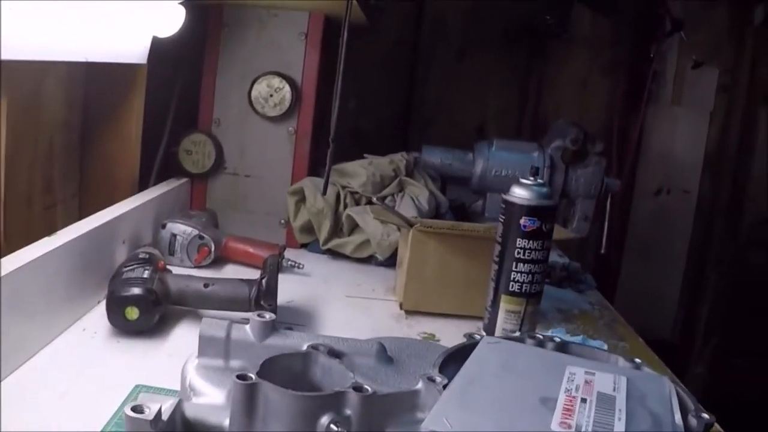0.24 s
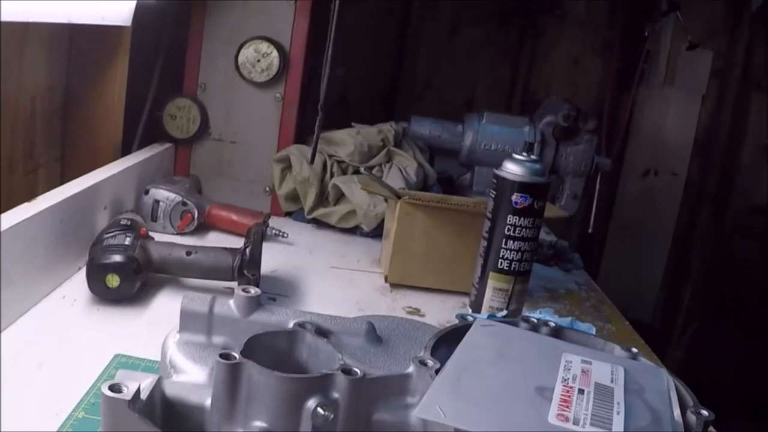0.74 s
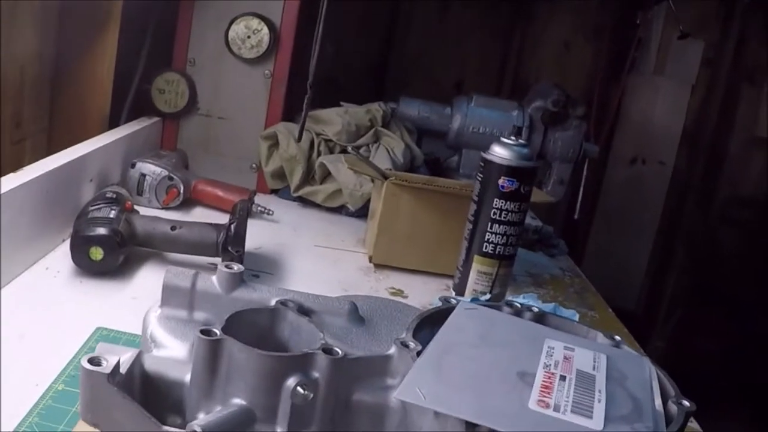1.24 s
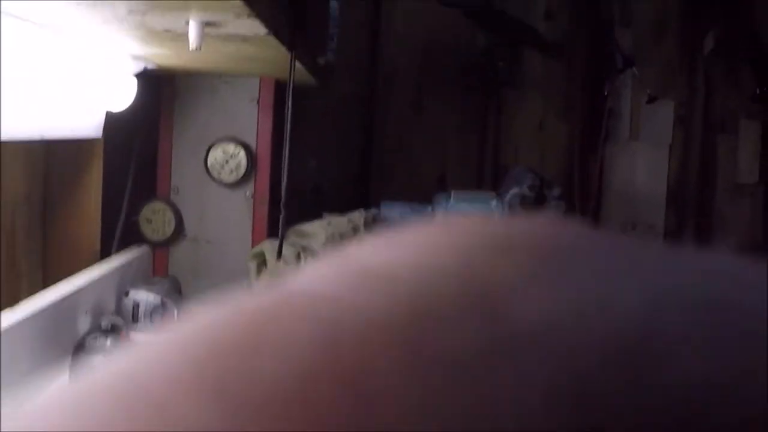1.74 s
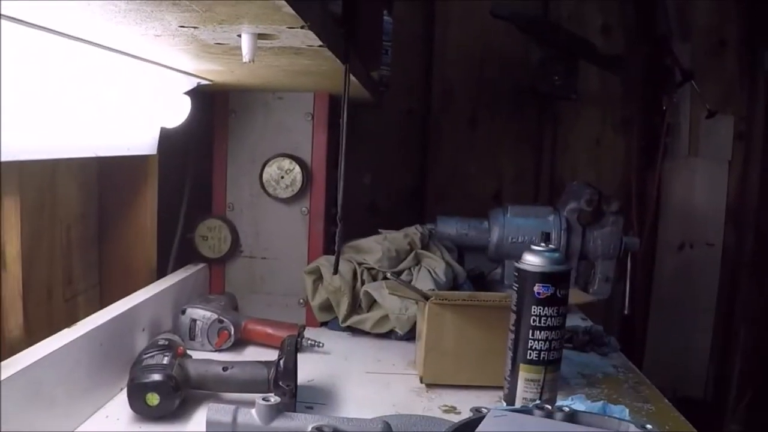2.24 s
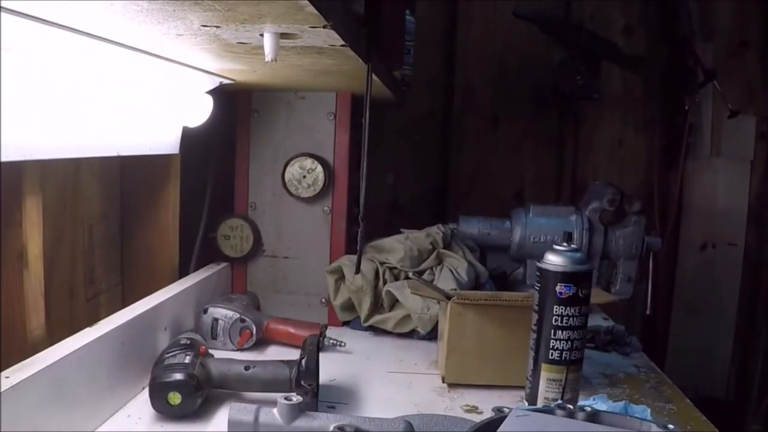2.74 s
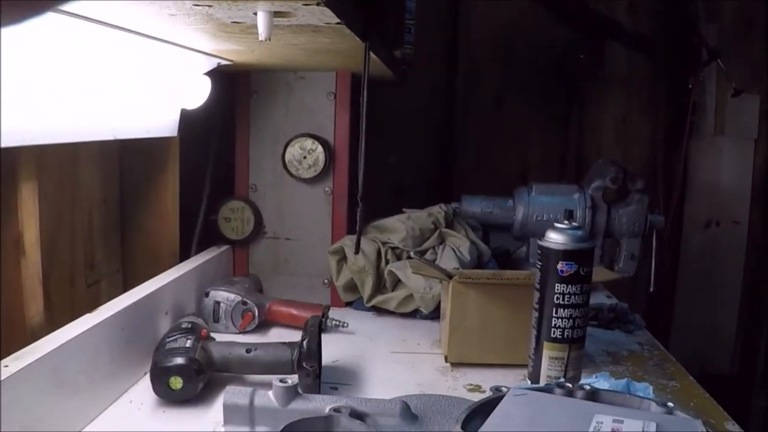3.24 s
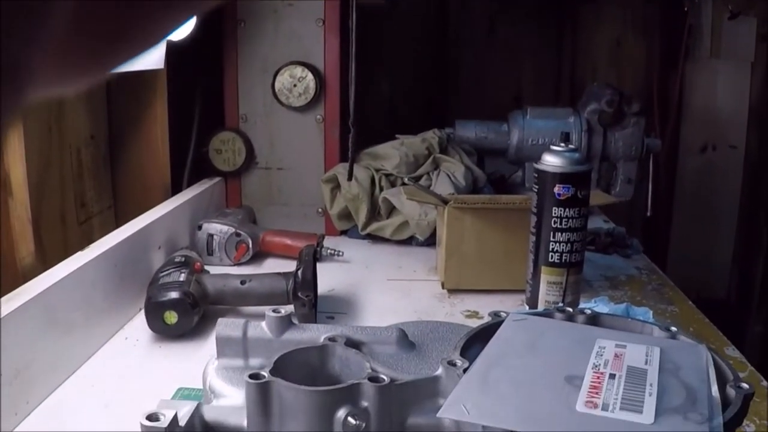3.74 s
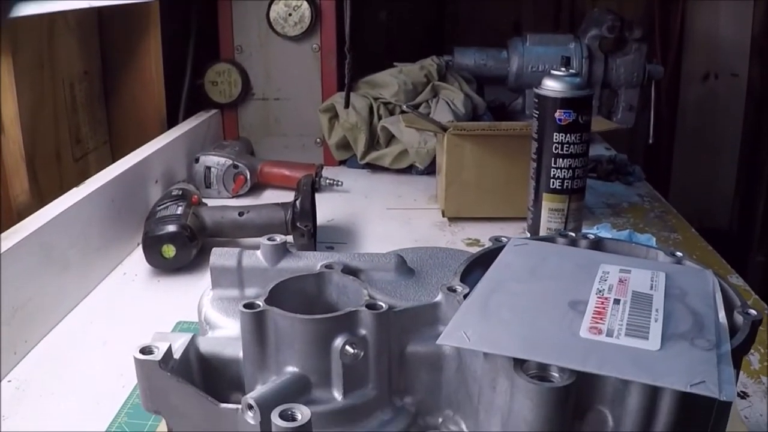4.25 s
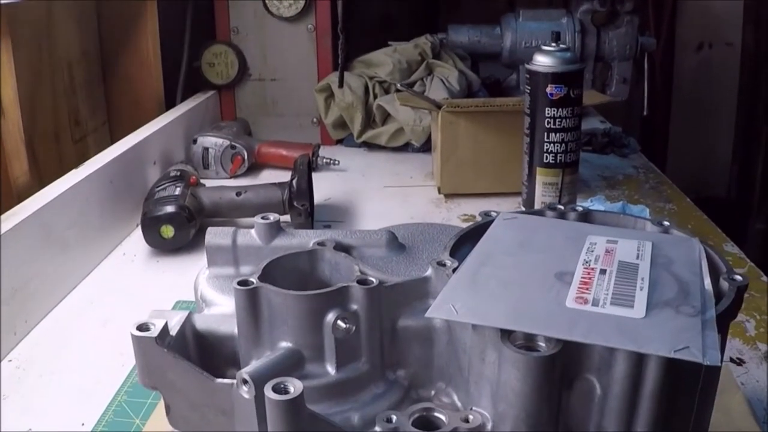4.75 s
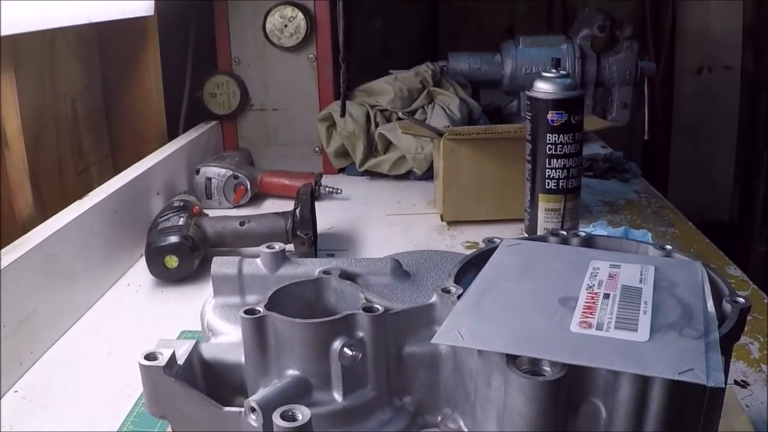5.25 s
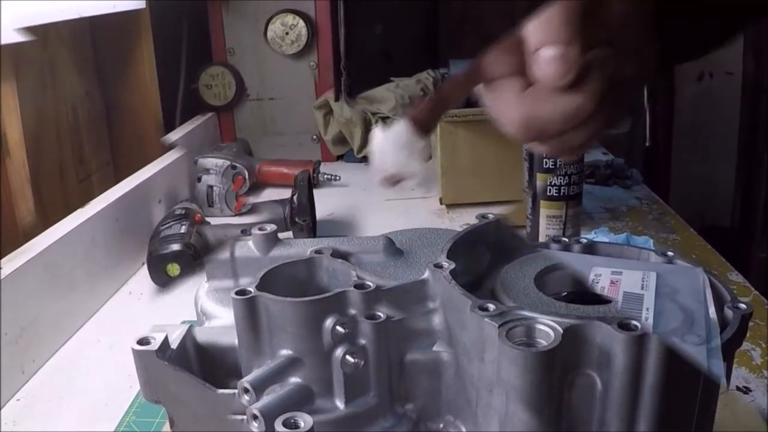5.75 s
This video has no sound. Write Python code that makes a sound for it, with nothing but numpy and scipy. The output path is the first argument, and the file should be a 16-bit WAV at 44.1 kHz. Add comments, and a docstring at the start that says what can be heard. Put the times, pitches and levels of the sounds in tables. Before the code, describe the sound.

A continuous hiss of air escaping from a leak, over low shed rumble, heard through a small camera held in a hand. It begins faint behind a hard thump at 0 s and a flurry of dull bumps, creaks and rubs until about 0.65 s. Sparser knocks and gritty scuffs follow, with firmer bumps at 1.0, 1.27 and 1.36 s, while the hiss swells. The heaviest cluster, thuds with a sharp nail tick and scrape, falls at 1.8-2.1 s. Only hiss and slight rumble remain until a loud abrupt pop near 2.78 s, then a crisp tick and thump at 3.05 s. Soft, deep bumps and creaks continue from 3.5 to 5.1 s, with a scuff at 4.9 s. Stereo collapses to mono from about 1.3 s and reopens after 3.2 s. The hiss changes colour, faintly whistly, leaning right, and is loudest and nearly alone after 5.2 s.

```python
"""In a shed, air hisses from a leak, growing louder and changing colour with the pose of a small camera,
while a hand grips, bumps and rubs its body. The leak is jet noise with echoes and narrow bands, over
a low background. Slips of the grip ring the housing modes, bumps and nail ticks are damped rings, and
scuffs are bursts of grainy noise. One pop throws the input offset into a slow swing. The two microphones
are folded to mono for a while below the very top, then opened to stereo again."""
import sys
import numpy as np
from scipy import signal
from scipy.fft import rfft, irfft
from scipy.io import wavfile
from scipy.ndimage import uniform_filter1d

SR = 44100
rng = np.random.default_rng(int(sys.argv[2]) if len(sys.argv) > 2 else 0)


def wrap_up_sound(samples):
    """Save the sound to the file named by the first command line argument, as 16-bit audio."""
    columns = np.atleast_2d(samples).T
    # keep every value between -1 and 1, then stretch to whole-number steps
    tamed = np.clip(columns, -1, 1)
    steps = np.round(tamed * 32767).astype(np.int16)
    wavfile.write(sys.argv[1], SR, steps)


N = 263718
T = np.arange(N) / SR


def amp(db):
    """Decibel law: level in dB to amplitude gain."""
    return 10 ** (np.asarray(db) / 20)


def rms_one(x):
    """Normalisation: scale a signal to unit root mean square."""
    return x / np.sqrt(np.mean(x ** 2) + 1e-20)


def in_time(rows):
    """Linear interpolation: rows that start with a time become one curve per further column."""
    seconds, *columns = np.transpose(rows)
    return [np.interp(T, seconds, column) for column in columns]


def butter(x, hz, kind, order=2):
    """Butterworth filtering: a passband without ripple."""
    return signal.sosfilt(signal.butter(order, hz, kind, fs=SR, output="sos"), x)


def coloured(white, points):
    """Spectral shaping: weight noise by a curve drawn over log frequency, then set its rms to 1."""
    hz = np.fft.rfftfreq(N, 1 / SR) + 1
    curve_hz, curve_db = np.transpose(points)
    db = np.interp(np.log(hz), np.log(curve_hz), curve_db)
    return rms_one(irfft(rfft(white) * amp(db), N))


def drift(rate_hz):
    """Band-limited randomness: low-passed noise of rms 1."""
    settled = butter(rng.standard_normal(N + SR), rate_hz, "low")[SR:]
    return rms_one(settled)


def ring(x, hz, t60):
    """Damped resonator: a unit click starts a decaying sine of height 1."""
    radius, angle = amp(-60 / (t60 * SR)), 2 * np.pi * hz / SR
    feedback = [1, -2 * radius * np.cos(angle), radius ** 2]
    return signal.lfilter([0, np.sin(angle)], feedback, x + 1e-18)


def resonances(x, peaks):
    """Superposition: resonances in parallel, each with its own bandwidth and gain."""
    return sum(amp(db) * signal.lfilter(*signal.iirpeak(hz, hz / width, SR), x)
               for hz, width, db in peaks)


# Spectrum of the shed's background. Each row: frequency in Hz, relative spectral level in dB per Hz.
SHED_SPECTRUM = [(12, 3), (20, 10.5), (33, -1.5), (129, -9.5), (171, -15), (243, -18.5), (323, -41.5),
                 (1100, -31.5), (1430, -37), (2420, -120)]


def shed(level_db=-36, apart_db=-9.0):
    """Partial coherence: low noise mostly alike at both microphones, with a weaker separate part."""
    white = rng.standard_normal((3, N))
    common, separate = white[0], white[1:]
    return amp(level_db) * coloured(common + amp(apart_db) * separate, SHED_SPECTRUM)


# Course of the leak. Each row: time in seconds, hiss level in dB before the left-right balance,
# camera pose from 0 to 2.
LEAK_COURSE = [(0, -53.5, 1.4), (.25, -56.5, 0.3), (.5, -55, 0.12), (.8, -51, 0.093), (1.6, -44, 0.46),
               (3.3, -43, 0.34), (3.9, -42, 1.38), (4.3, -41, 1.12), (4.7, -39, 1.08), (5.2, -39.5, 1.7),
               (5.4, -37.5, 1.84), (5.98, -37, 1.9)]
# Colour of the hiss, one list per pose. Each row: frequency in Hz, relative spectral level in dB per Hz.
HISS_SPECTRA = [
    [(590, -69), (1000, -20), (1980, -3), (2120, -4.5), (2360, -3.5), (2970, -11), (4460, 5.5),
     (5250, -0.5), (7690, -2), (11400, -18.5), (14600, -3.5), (15400, 8), (16000, -45)],
    [(880, -41), (1500, -7.5), (2180, -5), (3060, -11), (3840, -9), (4280, -7.5), (5880, -0.5),
     (6620, -3.5), (7160, 1.5), (9270, -7), (11100, -19.5), (14000, -9), (16000, -8)],
    [(240, -49), (400, -7), (865, -40), (1760, -9), (1930, -25), (2220, -15), (3060, -12.5), (7980, -1),
     (9450, -5.5), (11000, -28), (14600, -10.5), (15200, -11), (16000, -55)],
]
# Narrow bands that stand out, one list per pose. Each row: frequency in Hz, width in Hz, relative dB.
WHISTLE_BANDS = [
    [(3560, 69, -6), (4160, 69, -20), (4730, 140, -8.5), (5650, 36, -6), (6430, 66, 2.5), (7590, 47, 2),
     (7970, 61, 3.5), (8500, 25, -12), (9560, 130, 2), (9680, 50, -8)],
    [(3675, 96, -2), (5200, 59, -12), (5814, 160, -4), (6400, 73, -8), (7166, 58, 7.5), (7140, 62, -9),
     (8320, 40, 2), (8500, 38, -20), (8200, 110, -36), (8940, 70, 4.5), (9530, 58, -7.5)],
    [(2230, 110, -4), (4300, 59, -18), (4500, 60, -4), (4930, 100, -5), (5690, 45, -21), (6980, 120, 2.5),
     (7600, 77, 1), (9400, 44, 4), (9600, 170, -17)],
]


def leak(echo_db=-12.0, whistle_db=2.5):
    """Turbulent jet noise: each pose adds echoes, a colour and narrow bands; poses blend by power."""
    level_db, pose = in_time(LEAK_COURSE)
    jet = 0
    for k, (spectrum, whistles) in enumerate(zip(HISS_SPECTRA, WHISTLE_BANDS)):
        white = rng.standard_normal((2, N))
        lags = rng.integers(20, 700, (2, 12))      # samples, drawn apart for each side
        signs = rng.choice([-1, 1], 12)
        echoes = [sum(sign * np.roll(w, lag) for sign, lag in zip(signs, row))
                  for w, row in zip(white, lags)]
        white += amp(echo_db) * np.array(echoes)
        smooth = coloured(white, spectrum)
        excitation = coloured(white, [(1000, -1.5), (9000, 1.0), (16000, -55)])
        heard = smooth + amp(whistle_db) * resonances(excitation, whistles)
        share = np.clip(1 - abs(pose - k), 0, 1)
        jet = jet + np.sqrt(share) * rms_one(heard)
    body = butter(jet, 10500, "low", order=4) * amp([[-1.5], [5]])      # stronger on the right
    top = butter(jet, 10500, "high", order=4) * amp(3)      # arrives evenly
    return (body + top) * amp(level_db + 0.4 * drift(12))


# Finger scuffs. Each row: peak time in seconds, rise in seconds, fall in seconds, level in dB before
# the dip and the microphones, centre frequency in Hz, gain of the brighter part over that level in dB.
SCUFF_EVENTS = [(0.028, 0.0076, 0.0092, -32, 1160, -6.5), (.11, 0.0093, 0.08, -43, 960, -23),
                (0.18, 0.027, 0.0064, -43, 880, -20), (0.242, 0.0096, 0.012, -49.5, 1370, -22),
                (0.567, 0.0016, 0.011, -49, 596, -30), (0.598, 0.005, 0.0032, -30.5, 1630, -18),
                (.798, 0.0049, 0.012, -45, 1630, -17), (0.866, 0.005, 0.021, -44.5, 1810, -21),
                (0.891, 0.0067, 0.0089, -35, 660, -31), (0.986, .003, 0.017, -40, 1180, -12),
                (0.998, 0.0031, 0.069, -41.5, 720, -7), (1.104, 0.026, 0.0065, -42, 900, -4),
                (1.161, 0.0043, .015, -45, 1100, -15), (1.267, 0.0043, 0.03, -34, 810, 2.5),
                (1.358, 0.0072, 0.024, -34, 1030, -0.5), (1.423, 0.012, 0.0045, -37.5, 1340, -10),
                (1.487, 0.016, 0.023, -45.5, 833.3, 6.5), (1.786, .005, 0.0092, -50, 990, -10),
                (1.859, 0.027, 0.034, -50.5, 1970, 14), (1.866, 0.0053, 0.0013, -26.5, 1390, -11),
                (1.886, 0.0066, 0.064, -32, 990, -5), (1.977, 0.0077, 0.0083, -28.5, 1050, -27),
                (2.046, 0.04, 0.037, -36.5, 890, -25), (2.2, 0.042, 0.017, -43.5, 714, 1),
                (3.005, 0.0017, 0.021, -37.5, 680, 4.5), (3.048, 0.0032, 0.0054, -31.5, 1760, 10),
                (3.063, 0.0047, 0.016, -56.5, 1000, 24), (3.538, 0.0088, 0.0057, -48, 800, -28),
                (4.266, 0.0088, 0.011, -48, 724, -25), (4.507, 0.0091, 0.039, -46.5, 1040, -18),
                (4.76, 0.0066, 0.036, -46, 900, -15), (4.896, 0.065, 0.015, -34.5, 980, -15),
                (4.9, 0.042, 0.02, -30.5, 2580, -12), (5.049, 0.0025, 0.028, -44, 855, -22),
                (5.075, 0.0056, 0.03, -38.5, 1230, -2)]
# Resonances of the brighter part. Each row: frequency in Hz, width in Hz, relative level in dB.
SCUFF_RESONANCES = [(4900, 1600, 8), (6300, 930, 4), (7570, 700, 5.5), (14900, 2600, -2)]


def scuffs():
    """Friction: bursts of grainy noise around a centre pitch, with a brighter part above."""
    low, high = np.zeros((2, N))
    grit = rng.standard_normal((2, N)) * amp(3 * drift(300))
    for s, rise, fall, level_db, hz, bright_db in SCUFF_EVENTS:
        part = slice(round((s - rise) * SR), round((s + fall) * SR))
        shape = amp(level_db) * np.interp(T[part], [s - rise, s, s + fall], [0, 1, 0])
        band = butter(grit[0, part], [hz / 1.5, hz * 1.5], "band", order=3)
        low[part] += shape * rms_one(band)
        high[part] += shape * amp(bright_db)
    bright = butter(resonances(grit[1], SCUFF_RESONANCES), 3600, "high", order=4)
    return low, high * rms_one(bright)


def aftermath(times, levels_db, t60, lead):
    """Exponential power decay: 60 dB of build-up in lead seconds before each event, 60 dB of fall in t60."""
    kicks = np.zeros(N)
    np.add.at(kicks, (np.asarray(times) * SR).astype(int), amp(levels_db) ** 2)

    def tail(power, seconds):
        """First-order recursion: power falls by 60 dB in the given time."""
        return signal.lfilter([1], [1, -amp(-120 / (seconds * SR))], power + 1e-18)

    before = tail(kicks[::-1], lead)[::-1]
    return tail(kicks, t60) + before - kicks      # the event itself counts once


# Changing level of the grip, apart from what bumps and scuffs stir up, before the microphones.
# Each row: time in seconds, sway rumble in dB, housing creak in dB, finger rub in dB.
GRIP_LEVELS = [(0, -32, -31, -57), (.26, -26, -28, -55), (.35, -33, -59, -62.5), (.66, -46, -37, -55),
               (.72, -48, -55.5, -63), (.9, -33, -37, -48), (1.3, -25.5, -43, -46.5),
               (1.8, -22, -42.5, -46), (2.2, -28, -42, -53), (2.3, -37.5, -40, -50.5), (2.8, -36, -50, -66),
               (3.05, -31, -38.5, -45.5), (3.5, -26.5, -47, -55.5), (3.56, -29, -32.5, -48.5),
               (3.7, -29.5, -38, -58), (3.8, -37, -33.5, -49), (4.04, -27.5, -31.5, -50.5),
               (4.08, -26.5, -49, -58.5), (4.38, -23.5, -44, -57), (4.42, -24, -30.5, -47.5),
               (4.57, -23.5, -32.5, -49), (4.7, -28.5, -35, -55), (5.1, -26, -50, -58),
               (5.26, -38.5, -54.5, -58), (5.98, -55, -54, -55.5)]
# Housing modes. Each row: frequency in Hz, relative strike level in dB, t60 in seconds,
# group (0 deep, 1 middle, 2 high).
HOUSING_MODES = [(43, -4.5, 0.15, 0), (85, -3.5, 0.078, 0), (142.4, -4.5, 0.071, 1), (177.5, 8, 0.022, 1),
                 (270.5, 2, 0.04, 1), (301, -1.5, 0.078, 1), (328, -3.5, 0.04, 1), (404, -12, 0.047, 1),
                 (577, 11.5, 0.01, 2), (784, -2.5, 0.055, 2), (1050, 5.5, 0.0097, 2),
                 (1355, -3.5, 0.022, 2), (1870, 6, 0.0065, 2), (2260, 9.5, 0.0016, 2)]


def housing(slips_per_s=(60, 200, 1200), spread_db=4.0, palm_below_hz=120):
    """Modal excitation: random slips of the grip strike the modes; returns deep, middle and high."""
    slips = np.zeros((3, N))
    born = rng.random((3, N)) < np.array(slips_per_s)[:, None] / SR
    for hz, db, t60, group in HOUSING_MODES:
        g = int(round(group))
        size_db = db + spread_db * np.minimum(rng.exponential(1, N), 4)
        sizes = amp(size_db) * rng.choice([-1, 1], N)
        soft_contact = butter(born[g] * sizes, 1.8 * hz, "low")      # skin
        slips[g] += ring(soft_contact, hz, t60)
    sway, creak, rub = amp(in_time(GRIP_LEVELS)) ** 2      # powers
    # fingertip bumps bring extra creak, scuffs bring extra rub
    s, peak_db, hz, _ = np.transpose(BUMP_EVENTS)
    tips = hz > palm_below_hz
    creak = creak + aftermath(s[tips], peak_db[tips] - 14.5, t60=0.19, lead=0.035)
    s, _, _, level_db, *_ = np.transpose(SCUFF_EVENTS)
    rub = rub + aftermath(s, level_db - 0.5, t60=0.11, lead=0.074)
    return [np.sqrt(power) * rms_one(x) for power, x in zip((sway, creak, rub), slips)]


def swelling_rings(rows, swell):
    """Loaded oscillation: each ring swells with a time constant of swell cycles while damping kills it."""
    out = np.zeros(N + SR)
    phases = rng.normal(0, 0.71, len(rows))      # radians
    for (s, peak_db, hz, t60), phase in zip(rows, phases):
        t = T[:int(1.5 * t60 * SR)]
        shape = (1 - np.exp(-t * hz / swell)) ** 2 * amp(-60 * t / t60)
        at = round(s * SR)
        sine = np.sin(2 * np.pi * hz * t + phase)
        out[at:at + len(t)] += amp(peak_db) * shape / shape.max() * sine
    return out[:N]


# Hard nail ticks. Each row: start in seconds, envelope peak in dB before the microphones,
# ring frequency in Hz, t60 in seconds.
TICK_EVENTS = [(.597, -24.5, 1920, 0.0061), (.795, -38.5, 1880, 0.013), (.995, -34, 4370, 0.042),
               (1.009, -30, 655, .06), (1.272, -27.5, 920, 0.051), (1.424, -28.5, 1600, 0.0041),
               (1.867, -10.5, 1200, 0.0071), (1.868, -16.5, 1810, 0.0096), (1.887, -23.5, 1000, 0.042),
               (2.198, -37, 760, 0.1), (3.0465, -12, 4770, 0.0045), (3.0465, -20, 6300, 0.0076),
               (4.896, -27, 1645, 0.054), (5.076, -31.5, 1180, 0.023)]


def nail_ticks():
    """Impact: each hard nail sets off a short damped ring."""
    return swelling_rings(TICK_EVENTS, swell=1.65)


# Bumps on the housing, fingertips high and palm low. Each row: start in seconds, envelope peak in dB
# before the low-pass and the microphones, ring frequency in Hz, t60 in seconds.
BUMP_EVENTS = [(.002, 0, 204, 0.0076), (.009, -12.5, 309, 0.068), (.03, -9.5, 110, 0.045),
               (0.032, -16, 153, .019), (.106, -6, 236, 0.03), (.218, -19.5, 149, 0.032),
               (0.24, -23, 236, 0.041), (0.277, -15, 142, 0.043), (.302, -18, 151, 0.031),
               (0.318, -11, 101, 0.045), (0.367, -9.5, 184, 0.033), (.389, -16, 230, 0.04),
               (0.402, -23, 140, 0.041), (.458, -26, 159, 0.026), (.474, -13, 147, 0.026),
               (0.498, -20, 147, 0.035), (.564, -7, 208, 0.028), (0.596, -14.5, 205, 0.027),
               (0.603, -16, 87, 0.18), (0.631, -21, 155, 0.044), (0.799, -23, 205, 0.031),
               (0.814, -20, 189, 0.029), (0.861, -22, 289, 0.07), (0.879, -25, 339, .1),
               (0.989, -8, 166, 0.013), (.995, -6.5, 60, 0.077), (.996, -9.5, 273, 0.026),
               (1.013, -14, 253, 0.032), (1.019, -10.5, 70, 0.13), (1.16, -10, 187, 0.02),
               (1.161, -13, 59.6, 0.095), (1.261, -12, 63, 0.15), (1.266, -17, 149, 0.052),
               (1.355, -7, 55.3, .054), (1.355, -15.5, 150, 0.019), (1.508, -15, 209, 0.082),
               (1.69, -11.5, 248, 0.019), (1.692, -19.5, 60, 0.11), (1.787, -19, 150, .028),
               (1.827, -12, 37, .18), (1.84, -9, 198, .06), (1.854, -10.5, 232, 0.025),
               (1.863, -6, 61, 0.089), (1.876, -6, 238, 0.052), (1.884, -9.5, 70, .09),
               (1.905, -17.5, 276, 0.08), (1.92, -19, 260, 0.06), (1.961, -13, 43.6, .13),
               (2.013, -7, 277, .11), (2.022, -16, 103, 0.13), (2.059, -13, 165, .021),
               (2.064, -17, 39.3, 0.12), (2.142, -21, 221, 0.047), (3.018, -9.5, 36.4, 0.036),
               (3.042, -6, 42.2, 0.076), (3.045, -12, 137, 0.02), (3.074, -10, 37.5, 0.083),
               (3.53, -15, 76, 0.1), (3.536, -17, 204, 0.0069), (3.782, -11, 36.3, .08),
               (3.91, -13, 35.2, 0.26), (4.011, -30, 267, .039), (4.15, -14, 38.3, 0.21),
               (4.265, -10, 247, 0.047), (4.265, -13.5, 104, 0.073), (4.321, -13, 34, 0.068),
               (4.38, -18, 51.3, .16), (4.411, -20.5, 264, 0.042), (4.476, -12.5, 36.5, 0.28),
               (4.589, -16.5, 42, 0.25), (4.748, -14, 44.4, 0.11), (4.753, -12, 140, 0.039),
               (4.775, -18.5, 272, 0.073), (4.832, -10.5, 43.1, 0.12), (4.855, -20.5, 330, 0.038),
               (4.883, -19, 318, 0.032), (4.895, -10, 178, 0.042), (4.915, -12.5, 77.6, 0.096),
               (5.043, -18, 289.5, 0.14), (5.046, -14.5, 76.7, 0.27), (5.074, -18, 156, .026),
               (5.086, -16.5, 185, 0.051)]


def hand_bumps():
    """Soft impact: flesh loads the housing gradually and the hand damps its ring."""
    return butter(swelling_rings(BUMP_EVENTS, swell=0.26), 820.0, "low")


def ports(x, lean, lag_samples, twist_db, twist_hz):
    """Antisymmetric motion: the right takes the larger share; a delayed twist drives the sides oppositely."""
    twist = amp(twist_db) * butter(np.roll(x, lag_samples), twist_hz, "low")
    side = twist - np.clip(lean, 0, 1) * x
    return x + side * np.array([[1], [-1]])


def scene():
    """Superposition: shed, leak and handling add at the two microphones."""
    deep, middle, high = housing()
    scuff_low, scuff_high = scuffs()
    thud = deep + middle + hand_bumps()
    rub = high + scuff_low
    rub = rub - 0.27 * resonances(rub, [(3600, 1070, 0)])      # the handling sounds thinner around 3.6 kHz
    thud_sides = ports(thud, lean=1.0, lag_samples=206, twist_db=-11.0, twist_hz=595)
    rub_sides = ports(rub + nail_ticks(), lean=0.14, lag_samples=13, twist_db=10.0, twist_hz=1730)
    bright_sides = ports(scuff_high, lean=0.45, lag_samples=30, twist_db=-9, twist_hz=9000)
    return shed() + leak() + thud_sides + rub_sides + bright_sides


# Input offset after the pop, before smoothing. Each row: time in seconds, offset with full scale 1.
OFFSET_SWING = [(2.7774, .49), (2.85, -.16), (2.91, -.6), (2.97, -.9), (3.15, -.42), (3.3, -.2),
                (3.55, .35), (4.0, .16), (4.5, 0)]
# Gain of the side signal, 0 dB being full stereo. Each row: time in seconds, gain in dB below the
# split, gain in dB above it.
STEREO_OPENING = [(0, 3, -2), (.4, -2.5, -11), (1.3, -32, -65), (1.5, -79, -66), (2.7, -54, -74),
                  (3.2, -34, -33), (3.4, -12.5, -9.5), (3.7, -3.5, -3.5), (5.98, -1, 1)]


def record(dry, pop_s=2.7774, split_hz=2500, always_wide_hz=11500, cutoff_hz=16100):
    """Mid-side decomposition: the side fades by band, the offset is added, peaks clip, the top is cut."""
    mid, side = (dry[0] + dry[1]) / 2, (dry[0] - dry[1]) / 2
    low_db, high_db = in_time(STEREO_OPENING)

    def below(hz):
        """Zero-phase filtering: the split keeps each band's left-right balance."""
        return signal.sosfiltfilt(signal.butter(4, hz, fs=SR, output="sos"), side)

    low, foldable = below(split_hz), below(always_wide_hz)
    always_wide = side - foldable
    side = amp(low_db) * low + amp(high_db) * (foldable - low) + always_wide
    # the offset starts with a jump, heard as the pop
    offset = uniform_filter1d(in_time(OFFSET_SWING)[0], size=1500) * (T >= pop_s)
    out = np.clip(mid + offset + side * [[1], [-1]], -1, 1)
    return signal.sosfilt(signal.cheby2(12, 70, cutoff_hz, fs=SR, output="sos"), out)


dry = scene()
out = record(dry)
wrap_up_sound(out)
```